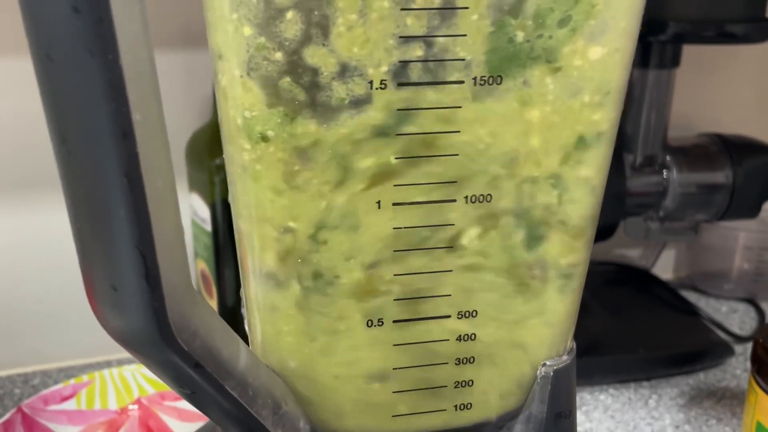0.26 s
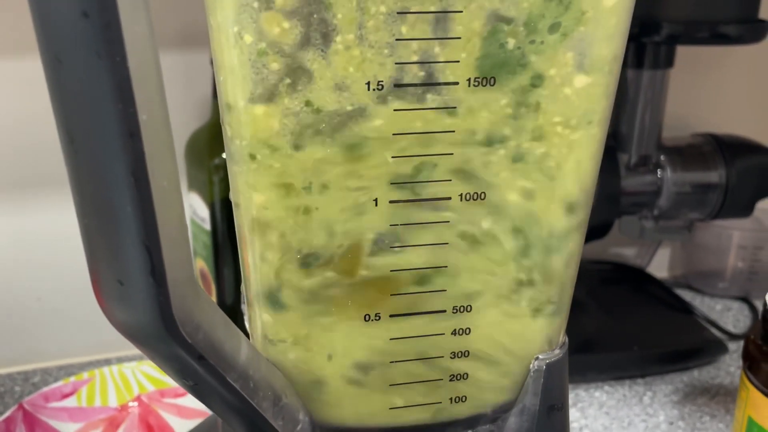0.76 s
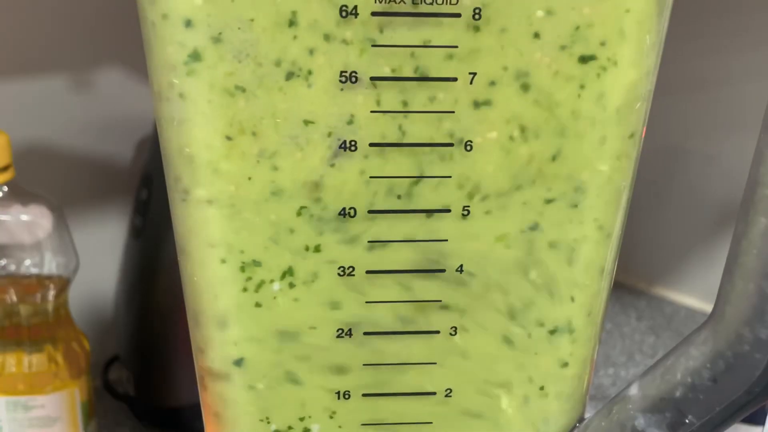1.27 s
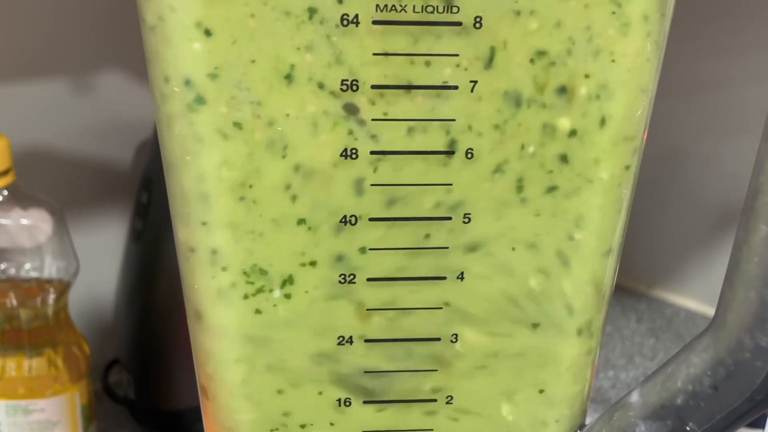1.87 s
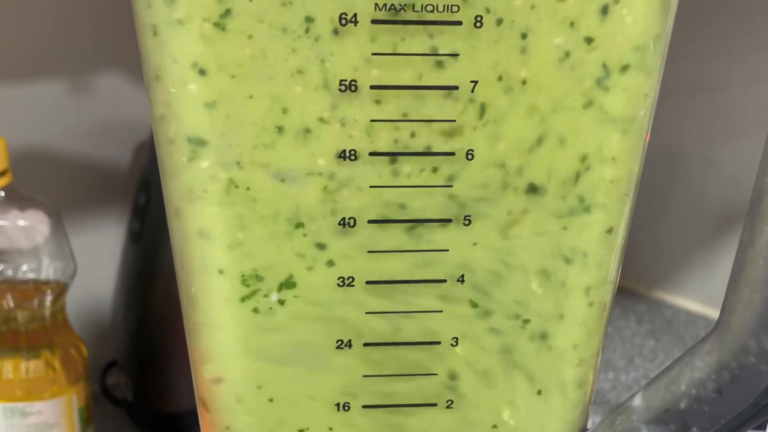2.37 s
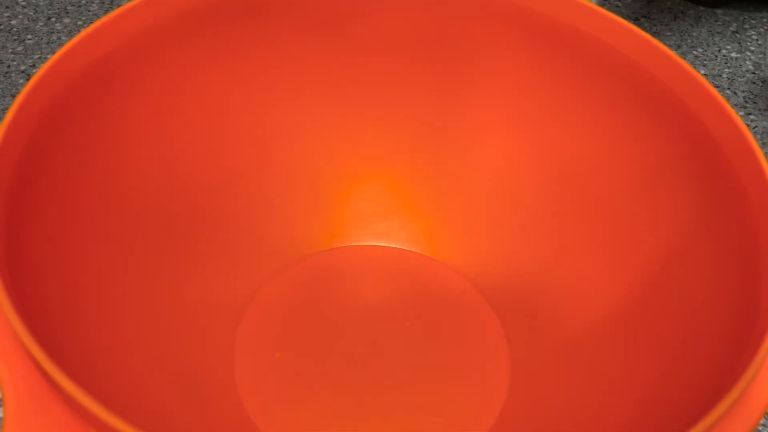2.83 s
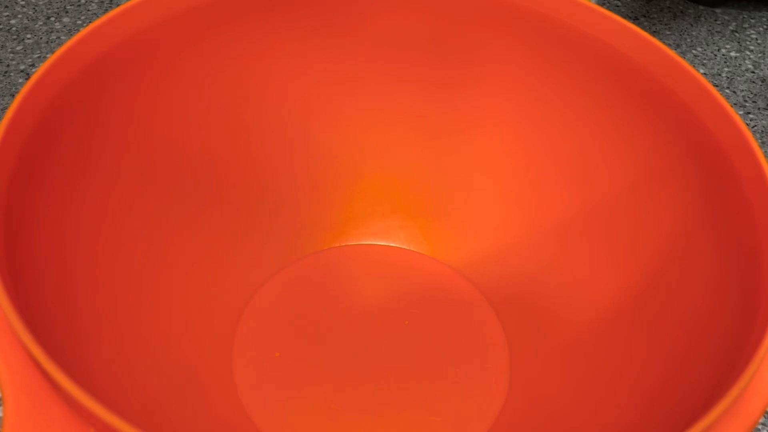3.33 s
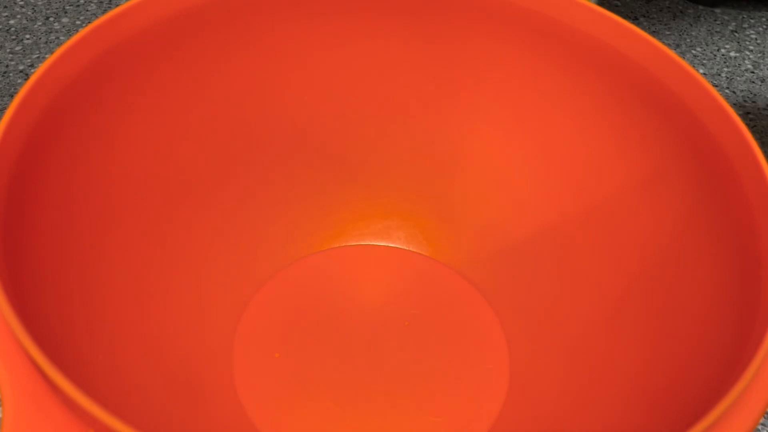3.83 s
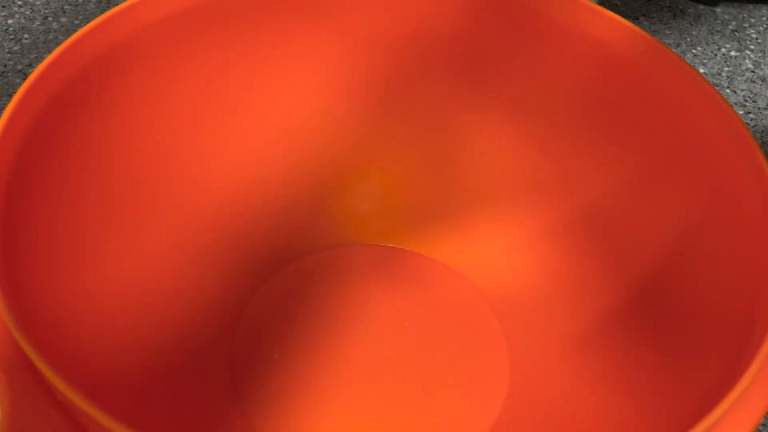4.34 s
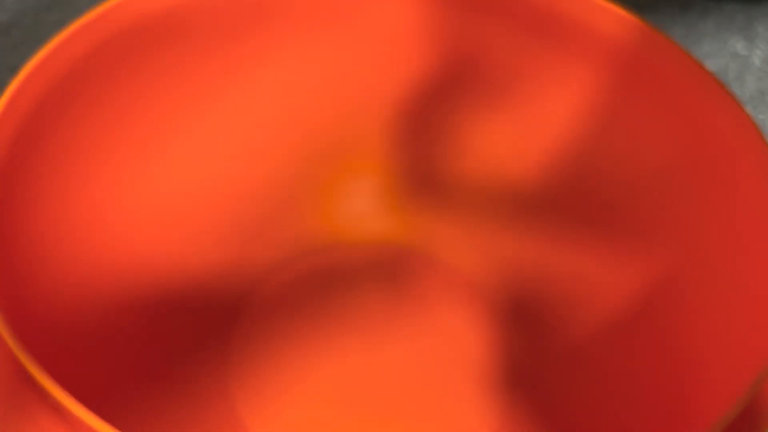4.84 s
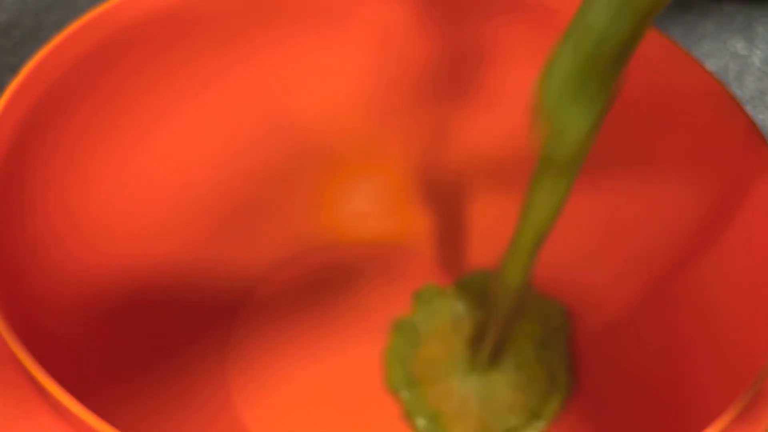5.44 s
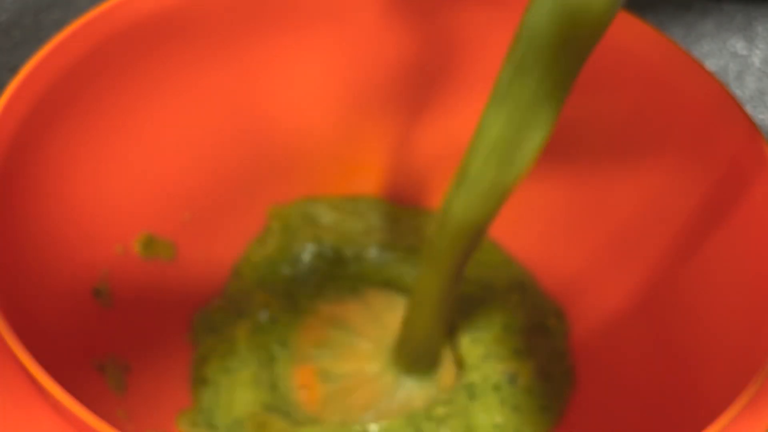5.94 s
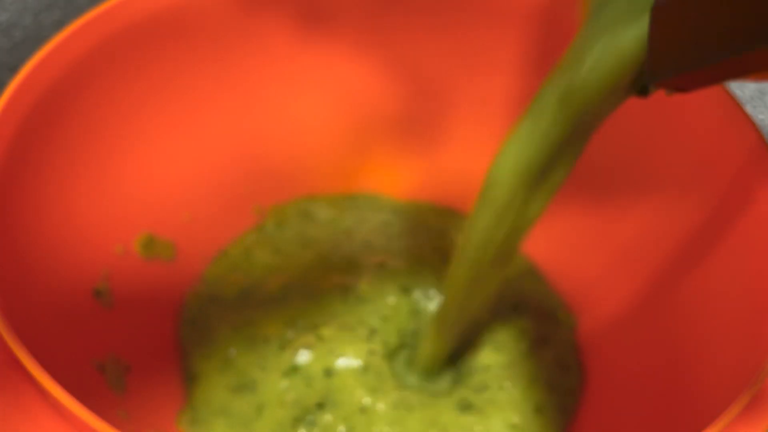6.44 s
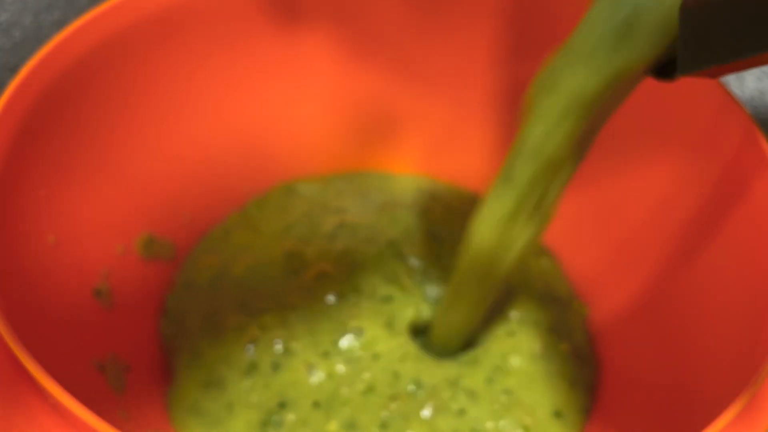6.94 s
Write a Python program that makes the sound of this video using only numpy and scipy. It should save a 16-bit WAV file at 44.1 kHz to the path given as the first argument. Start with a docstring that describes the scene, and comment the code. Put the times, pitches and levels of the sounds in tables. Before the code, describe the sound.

Loud blender churning and whining at two speeds stops dead, hollow plastic knocks follow, then thick wet sauce pours crackling and plopping into a plastic bowl.

```python
"""A countertop blender churns a herb sauce: first slow and chunky, then abruptly faster and smooth.
Noise shaped by the jug, plus a hum and a whine tied to the turning drive, make its sound.
The scene cuts abruptly to the handling of the plastic jug, which knocks about (damped tones); then thick
sauce pours into a plastic bowl with wet splats (noise bursts and bubbles) and crackle (random clicks).
A phone close by hears it all, with a short room tail and a low room rumble."""
import sys
import numpy as np
from scipy import signal
from scipy.fft import rfft, irfft
from scipy.io import wavfile
from scipy.ndimage import uniform_filter1d

SR = 44100
rng = np.random.default_rng(int(sys.argv[2]) if len(sys.argv) > 2 else 0)


def put_to_file(sound):
    """Save the sound as 16-bit audio at rate SR, in the file named by the first command-line argument."""
    columns = np.atleast_2d(sound).T  # one column per channel
    safe = np.clip(columns, -1, 1)
    whole_steps = np.round(safe * 32767)
    wavfile.write(sys.argv[1], SR, whole_steps.astype(np.int16))


N = 317520
TIME, BINS = np.arange(N) / SR, np.arange(N // 2 + 1) * SR / N  # seconds; Hz
CUT_S, POUR_S = 2.70, 5.377  # cut from blending to handling; the pouring starts

# How strongly the sauce flows. Each row: time in seconds, crackle level in dB.
FLOW = [(5.36, -59), (5.43, -57), (5.56, -50), (5.83, -44), (6.1, -43.5), (6.45, -47.5), (6.81, -50.5),
        (7.2, -53)]


def amp(db):
    """Decibels to gain."""
    return 10 ** (np.asarray(db) / 20)


def unit(x):
    """Scale to rms 1."""
    return x / np.sqrt(np.mean(x ** 2))


def curves(table):
    """Each column of a time table at every sample."""
    s, *columns = np.transpose(table)
    return [np.interp(TIME, s, c) for c in columns]


def read_db(points, hz):
    """Read a (Hz, dB) table on a log-frequency axis."""
    f, db = np.transpose(points)
    return np.interp(np.log(np.maximum(hz, 1)), np.log(f), db)


def shape(x, gain):
    """Filter a whole track by a gain per frequency bin."""
    return irfft(rfft(x) * gain, N)


def above(hz, order=4):
    """High-pass gain per frequency bin."""
    return (BINS / hz) ** order / np.sqrt(1 + (BINS / hz) ** (2 * order))


def band(x, lo_hz, hi_hz, order=2):
    """Causal band-pass."""
    sos = signal.butter(order, [lo_hz, min(hi_hz, .45 * SR)], "band", fs=SR, output="sos")
    return signal.sosfilt(sos, x)


def walk(rate):
    """Smooth chance with rms 1, changing about rate times a second."""
    k = max(int(SR / rate), 1)
    steps = np.repeat(rng.standard_normal(N // k + 1), k)
    return unit(uniform_filter1d(uniform_filter1d(steps, k), k)[:N])


def fade(t, t60):
    """Exponential decay, 60 dB down at t60."""
    return np.exp(-np.log(1000) * t / t60)


def gate(start, stop):
    """On between two times, with 4 ms edges."""
    return uniform_filter1d(((TIME >= start) & (TIME < stop)) * 1., 176)


def add(track, s, sound):
    """Mix a sound into a track at time s."""
    i = min(max(int(s * SR), 0), N)
    track[i:i + len(sound)] += sound[:N - i]


def clicks(rate, spread_db):
    """Random impulses, mostly small and a few large."""
    size = amp(spread_db * np.minimum(rng.exponential(size=N), 4))
    return (rng.random(N) < rate / SR) * size * rng.choice([-1, 1], N)


def blender(run, colour, body, orders, churn_db, hum_db, whine_db, chop_db, slosh_db, beat, wobble):
    """Blades churn and chop sauce in a ringing jug; the drive hums and the motor whines with its speed."""
    whine_per_turn = 65
    whine_hz, line_db, load_db = curves(run)
    turn = np.cumsum(whine_hz * (1 + wobble * walk(38.9))) / SR / whine_per_turn
    # turbulence throbs as the blades pass; bits of food add ticks
    throb = 1 + beat * np.cos(2 * np.pi * 5 * turn)
    stir = rng.standard_normal(N) * throb + amp(chop_db) * unit(clicks(350, 2.0))
    # the vortex sloshes, so each octave swells a little on its own
    octave = np.log2(np.clip(BINS, 40, 10240) / 40)
    churn = 0
    for k in range(9):
        part = shape(stir, np.maximum(1 - abs(octave - k), 0))
        churn = churn + part * amp(slosh_db * walk(22.33) / (1 + 0.59 * abs(k - 3)))
    lift_db = sum(db / (1 + (2 * (BINS - hz) / width) ** 2) for hz, width, db in body)
    churn = unit(shape(churn, amp(read_db(colour, BINS) + lift_db) * above(31.4, order=10)))
    hum = 0
    for k, db in orders:
        phase = 2 * np.pi * (round(k) * turn + rng.random()) + 0.25 * walk(8.63)
        hum = hum + amp(db + 1.2 * walk(7.21)) * np.sin(phase)
    whine = unit(amp(0.2 * walk(18.4)) * np.sin(2 * np.pi * whine_per_turn * turn))
    drive = amp(churn_db) * churn + amp(hum_db) * unit(hum)
    return amp(load_db) * drive + amp(line_db + whine_db) * whine


def blending():
    """A slow run through chunks, then a faster run through smooth sauce with low motor tones."""
    change_s = 1.072
    # The two runs. Each row: time in seconds, whine pitch in Hz,
    # whine level in dB, level of churning and hum in dB (levels before the trims below).
    chunky_run, smooth_run = [(0.03, 2340, -28, -18), (0.372, 2343, -25, -18), (1.05, 2350, -23.5, -17.5)], [(1.12, 2779, -33, -24.5), (2.62, 2782, -33, -25)]
    # Colour of the churning noise. Each row: frequency in Hz, relative level in dB per Hz.
    chunky_colour, smooth_colour = [(45, -2.5), (110, 0.5), (270, 1), (600, -5.5), (1250, -8.5), (2100, -8),
                                    (3200, -15), (5100, -14.5), (7000, -18.5), (10000, -22), (12300, -30),
                                    (15500, -42)], [(45, -32), (110, -3), (270, -3.5), (550, -3),
                                                           (1350, -12.5), (2200, -11), (3450, -18.5),
                                                           (5000, -14.5), (7500, -20.5), (10500, -25.5),
                                                           (13000, -30.5), (15500, -42)]
    # Resonances of jug and housing. Each row: frequency in Hz, width in Hz, lift in dB.
    chunky_body, smooth_body = [(416, 26, 0), (680, 110, 4), (1654, 83, 9), (2210, 140, 6),
                                (4190, 160, 5.5), (5140, 400, 4), (9230, 290, 10.5)], [(540, 39, 4.4), (1715, 38, 9.3), (2168, 150, 9.1),
                                                     (2885, 260, 9.5), (3820, 110, 4.8), (4216, 120, 8.5),
                                                     (9480, 270, 8.9)]
    # Hum and high tones of the drive. Each row: multiple of the turn rate, relative level in dB.
    chunky_orders, smooth_orders = [(6, 0.5), (7, 3), (12, 1), (15, 1)], [(1, 3), (2, -3), (5, 5), (6, -16), (7, -4.5),
                                                           (8, -2), (12, -8), (14, -4), (18, -2.5),
                                                           (23, -8.5), (95, -7), (120, -7), (245, -11)]
    # Low motor tones at the higher speed. Each row: frequency in Hz, typical level in dB.
    motor_tones = [(113, -38), (120, -48), (156, -50)]
    chunky = blender(chunky_run, chunky_colour, chunky_body, chunky_orders,
                     churn_db=-3.0, hum_db=-13.5, whine_db=-2.5, chop_db=-11.0, slosh_db=2.0,
                     beat=0.064, wobble=0.002)
    smooth = blender(smooth_run, smooth_colour, smooth_body, smooth_orders,
                     churn_db=0.0, hum_db=-4.0, whine_db=-3.5, chop_db=-8.0, slosh_db=0.5,
                     beat=0.1, wobble=0.00043)
    tones = 0
    for hz, db in motor_tones:
        tone = np.sqrt(2) * np.sin(2 * np.pi * hz * TIME + 0.48 * walk(24.74))
        tones = tones + amp(db + 2.3 * walk(11)) * tone
    return chunky * gate(0, change_s) + (smooth + tones) * gate(change_s, CUT_S)


def lump():
    """The blades tear through a lump: a brief surge of dull chopping."""
    centre_s, width_s, level_db = 0.737, 0.11, -29
    chop = unit(band(clicks(300, 1.5), 200, 940))
    return amp(level_db) * chop * np.exp(-((TIME - centre_s) / width_s) ** 2)


def boom(hz, rise_s, t60, glide):
    """A damped tone that swells quickly and glides by some octaves in its first 0.1 s."""
    t = np.arange(SR // 3) / SR
    ratio = 2 ** (glide * np.minimum(10 * t, 1))
    swell = np.minimum(t / rise_s, 1) ** 2 * fade(np.maximum(t - rise_s, 0), t60)
    return swell * np.sin(2 * np.pi * hz * np.cumsum(ratio) / SR)


def wall_ring(hz, t60, spread=0.072):
    """A plastic wall rings with a cluster of close, unevenly spaced modes."""
    t = np.arange(SR // 3) / SR
    detune, phase = rng.uniform(-1.11, 1, size=(2, 16))
    modes = sum(np.sin(2 * np.pi * (hz * (1 + spread * d) * t + p)) for d, p in zip(detune, phase))
    return unit(modes) * fade(t, t60) * (1 - np.exp(-t * hz))


def knock(level_db, upper_hz, lower_hz, low_db, high_db, contact_s=0.00087, crack_db=-3, crack_t60=0.063,
          knock_db=-12, low_lift_db=12, high_lift_db=9, favour_db=9, favour_octaves=0.16, top_hz=6000):
    """A rough contact rings the plastic; its place favours some modes, and harder blows reach higher."""
    # What the plastic rings with. Each row: frequency in Hz, relative level in dB, t60 in seconds.
    plastic = [(340.5, 6.5, 0.13), (430, 10.5, 0.08), (666, 7.5, 0.089), (769, 4, 0.15), (855, 12, 0.057),
               (971, 10.5, 0.065), (1260, 10.5, 0.023), (1397, 11.5, 0.023), (2110, 14.5, 0.072),
               (2380, 29, 0.012), (2780, 14, 0.064), (3560, 20.5, 0.017)]
    t = np.arange(SR // 4) / SR
    chance = rng.standard_normal((3, len(t)))
    ring = 0
    for (hz, db, t60), detune, phase in zip(plastic, chance[0], chance[1]):
        near = sum(np.exp(-(np.log2(hz / place_hz) / favour_octaves) ** 2)
                   for place_hz in (upper_hz, lower_hz))
        tone = np.sin(2 * np.pi * (hz * (1 + 0.0174 * detune) * t + phase))
        ring = ring + amp(db + favour_db * near) * fade(t, t60) * tone
    crack = band(chance[2], 110, 7000, order=1) * fade(t, crack_t60)
    blow = (unit(ring) + amp(crack_db) * unit(crack)) * (1 - np.exp(-t / contact_s))
    reach_hz = top_hz * 2 ** max((level_db + 23.0) / 10, 0)
    out = 0
    # low, middle and treble, each levelled by its first 25 ms
    for lo, hi, db in ((260, 514, low_db + low_lift_db),
                       (764, 1640, 0),
                       (2060, reach_hz, high_db + high_lift_db)):
        part = band(blow, lo, hi)
        out = out + amp(level_db + db + knock_db) * part / np.std(part[:SR // 40])
    return out


def knocks():
    """The housing rings out; then each jug knock leaves one wall ringing and brings a low boom."""
    # Knocks of the jug. Each row: start in seconds, level in dB, upper and lower Hz that the blow favours,
    # low ring in dB, treble in dB (these three levels before the trims in knock),
    # ringing wall in Hz, its dB and t60 in seconds, boom in Hz, its dB,
    # its glide in octaves per 0.1 s, its swell in seconds, its t60 in seconds.
    blows = [(2.798, -17, 1450, 305, -13, -15, 1450, -21, 0.036, 185, -17.5, -0.73, 0.02, .19),
             (3.031, -40, 915, 346, -3.5, -12, 960, -40, 0.11, 240, -25.5, -0.74, 0.02, .08),
             (3.313, -11.5, 1310, 386, -13, -12.5, 1392, -22.5, .03, 119, -16, -0.98, 0.029, 0.069),
             (4.055, -26, 745, 433, -2, -5, 2560, -47, 0.28, 162.4, -11.5, -1.86, 0.026, 0.16),
             (4.381, -16, 1230, 379, -13, -20, 1010, -31, .04, 111, -18, .94, 0.023, 0.35),
             (4.637, -34.5, 820, 373, -6, -12, 794, -39, 0.15, 198, -20.5, .29, 0.015, 0.19),
             (4.788, -12.5, 905, 345, -12.5, -14, 876, -19, 0.044, 208, -10.5, -0.17, 0.013, 0.19)]
    out = np.zeros(N)
    add(out, CUT_S, amp(-45) * boom(920, rise_s=.002, t60=0.44, glide=0))  # housing
    for row in blows:
        s, db, upper_hz, lower_hz, low_db, high_db = row[:6]
        ring_hz, ring_db, ring_t60, boom_hz, boom_db, glide, swell_s, boom_t60 = row[6:]
        add(out, s, knock(db, upper_hz, lower_hz, low_db, high_db))
        add(out, s, amp(ring_db) * wall_ring(ring_hz, ring_t60))
        add(out, s, amp(boom_db) * boom(boom_hz, swell_s, boom_t60, glide))
    return out


def touches(body_t60=.075, click_t60=0.024, contact_s=0.00096, hollow_db=-2):
    """Light contacts of hand and jug: a sharp click and a short hollow answer of the plastic."""
    # Each row: start in seconds, body level in dB, click level in dB (both before the fades).
    contacts = [(2.856, -34, -35), (2.936, -43, -54), (2.957, -47, -52), (3.01, -40, -40), (3.07, -42, -44),
                (3.173, -46.5, -48), (3.388, -36, -41), (3.443, -47, -36), (3.573, -53, -47),
                (3.799, -45, -34.5), (3.98, -56, -47.5), (4.224, -55, -51), (4.304, -42, -40.5),
                (4.483, -35, -54), (4.566, -54, -49), (4.661, -41, -43), (5.315, -69, -55)]
    out, t = np.zeros(N), np.arange(SR // 8) / SR
    for s, body_db, click_db in contacts:
        chance = rng.standard_normal((2, len(t)))
        body = unit(band(chance[0], 540, 1070)) + amp(hollow_db) * unit(band(chance[0], 270, 460))
        click = unit(band(chance[1], 2000, 3100, order=1))
        touch = amp(body_db) * body * fade(t, body_t60) + amp(click_db) * click * fade(t, click_t60)
        add(out, s, touch * (1 - np.exp(-t / contact_s)))
    return out


def pool_depth(s):
    """How far the pool has gathered on the bottom of the bowl, 0-1."""
    start_s, fill_s = 5.47, 0.53
    return np.clip((s - start_s) / fill_s, 0, 1)


def bubble(t, hz, cycles, glide=0.16):
    """A pocket of air rings for some cycles, rising in pitch."""
    age = np.clip(t * hz / cycles, 0, 2)
    tone = np.sin(2 * np.pi * cycles * age * (1 + glide * age / 2))
    return tone * fade(age, 0.78) * (1 - np.exp(-age * cycles))


def splat(hz, snap_db, depth, burst_db=-2, squelch_db=-1, spray_t60=0.032, snap_t60=0.0029,
          spray_share=0.51, rise_s=0.00084, cycles=22, chain_s=.014, chain_octaves=.3,
          low_db=-17, pool_lift_db=11, high_db=-9):
    """A fold snaps, squelches around its trapped air's pitch and sprays; a deeper pool adds body."""
    t = np.arange(SR // 12) / SR
    chance = rng.standard_normal((2, len(t)))
    swell = 1 - np.exp(-t / rise_s)
    decay = fade(t, snap_t60) + spray_share * fade(t, spray_t60)
    wet = chance[0] * amp(1.5 * chance[1]) * decay * swell
    # the fold breaks into a quick chain of lesser bubbles
    squelch = 0
    for late, pitch in rng.random(size=(6, 2)):
        bubble_hz = hz * 2 ** (chain_octaves * (2 * pitch - 1))
        squelch = squelch + amp(-12 * late) * bubble(t - chain_s * late, bubble_hz, cycles / 2)
    snap = unit(band(wet, 2000, 8000)) + amp(high_db) * unit(band(wet, 3800, 9300))
    body = amp(low_db + pool_lift_db * depth) * unit(band(wet, 366, 1100))
    burst = amp(burst_db) * unit(bubble(t, hz, cycles))
    sound = amp(snap_db) * snap + burst + amp(squelch_db) * unit(squelch) + body
    return sound / np.std(sound[:SR // 125])  # levelled by its first 8 ms


def splats(splat_db=-2.5, scatter_db=5, scatter_octaves=0.8, small_snap_db=-5):
    """Big folds splat and thud on the bowl; small ones fall at random, as strong as the flow."""
    # Loudest splats. Each row: start in seconds, level in dB before the trim splat_db,
    # pitch of the trapped air in Hz, snap level in dB before it is mixed with the bubbles.
    folds = [(5.415, -32, 3160, -4), (5.543, -28.5, 2860, -1.5), (5.603, -33.5, 4540, -7),
             (5.678, -25, 1810, 1), (5.752, -26.5, 2120, -1), (5.836, -29, 1920, 18), (5.886, -32, 2670, 0),
             (5.895, -25, 1840, -4), (5.923, -27, 2280, -9), (5.968, -28.5, 2000, 1),
             (5.977, -21.5, 5240, 3), (6.028, -30, 2280, -8), (6.077, -23, 1180, 3.5),
             (6.102, -25.5, 1920, -14), (6.128, -28, 1870, -9), (6.156, -29, 2020, -10),
             (6.195, -38.5, 734, -20), (6.227, -34, 2230, -8), (6.291, -40, 2400, -8),
             (6.389, -29, 5140, -0.5), (6.435, -35, 2200, -3), (6.465, -32, 2700, -2),
             (6.537, -37.5, 2600, -2), (6.65, -37.5, 740, -10), (6.745, -36, 590, -1),
             (6.855, -17, 1270, 8.5), (6.893, -23.5, 1210, 3.5), (6.918, -39, 2350, -10),
             (6.973, -27, 780, 7), (7.038, -23, 2400, -9), (7.08, -26, 645, -11)]
    big_pocket_hz, thud_db, thud_lag_s = 960, 7, 0.0109
    small_per_s, small_db, small_hz = 55, 1, 2000
    out = np.zeros(N)
    for s, db, hz, snap_db in folds:
        add(out, s, amp(db + splat_db) * splat(hz, snap_db, pool_depth(s)))
        # a fold that traps a big pocket of air is heavy enough to thud
        weight = 1 / (1 + (hz / big_pocket_hz) ** 4)
        thud = boom(160, rise_s=0.0116, t60=0.027, glide=0)
        add(out, s + thud_lag_s, amp(db + thud_db) * weight * thud)
    flow_db, = curves(FLOW)
    for k, (late, size, pitch) in enumerate(rng.uniform(-1, 1, size=(100, 3))):
        s = POUR_S + (k + 2 + 2 * late) / small_per_s
        db = np.interp(s, TIME, flow_db) + small_db + scatter_db * size
        hz = small_hz * 2 ** (scatter_octaves * pitch)
        add(out, s, amp(db) * splat(hz, small_snap_db, pool_depth(s)))
    return out


def snaps(snap_t60=0.0081, spray_t60=0.046, spray_db=-13):
    """Films of sauce burst with a sharp dry tick and a trace of spray."""
    # Each row: start in seconds, level in dB before the fade.
    bursts = [(5.38, -33), (5.4, -29), (5.439, -30), (5.652, -37), (5.74, -22.5), (5.864, -30),
              (6.061, -26), (6.292, -37), (6.322, -26), (6.69, -24.5), (6.839, -42), (6.8555, -39),
              (7.163, -25)]
    out, t = np.zeros(N), np.arange(SR // 20) / SR
    for s, db in bursts:
        tick = unit(band(rng.standard_normal(len(t)), 3800, 12000, order=1))
        add(out, s, amp(db) * tick * (fade(t, snap_t60) + amp(spray_db) * fade(t, spray_t60)))
    return out


def grains(hz, rate, spread_db, cycles):
    """Random air pockets near one pitch; thick sauce damps each within some cycles."""
    t = np.arange(SR // 20) / SR
    grain = np.sin(2 * np.pi * hz * t * (1 + 2 * t)) * fade(t, cycles / hz) * (1 - np.exp(-t * hz))
    return unit(signal.fftconvolve(clicks(rate, spread_db), grain)[:N])


def stream(crackle_db=0, fizz_db=-10, gurgle_db=-5, gurgle_hz=2100, gurgle_octaves=0.32,
           blob_db=-50, drum_db=-42, clump_db=6.5):
    """The ribbon crackles with bursting films; a stronger flow folds in more air, which gurgles."""
    # Colour of the crackle. Each row: frequency in Hz, relative level in dB per Hz.
    sauce_colour = [(400, -19), (700, -22), (1200, -17), (2000, -7), (2900, -5), (5000, -3.5), (7000, -2.5),
                    (10000, -2.5), (13000, -10.5), (15500, -2)]
    flow_db, = curves(FLOW)
    films = unit(clicks(1100, 4.3)) + amp(fizz_db) * rng.standard_normal(N)
    films = unit(shape(films, amp(read_db(sauce_colour, BINS)) * above(160, order=2)))
    gurgle = 0
    for hz in np.geomspace(1200, 3800, num=12):
        share = np.exp(-(np.log2(hz / gurgle_hz) / gurgle_octaves) ** 2)
        gurgle = gurgle + share * grains(hz, 45, 3.5, 18)
    strength = amp(0.6 * (flow_db - flow_db.max()))
    # the ribbon lands in folds, so the crackle comes in clumps
    wet = (films + amp(gurgle_db) * strength * unit(gurgle)) * amp(clump_db * walk(70))
    # the bowl walls smear every burst over some milliseconds
    t = np.arange(SR // 15) / SR
    smear = rng.standard_normal(len(t)) * fade(t, .045)
    wet = .75 * wet + .65 * signal.fftconvolve(wet, smear / np.linalg.norm(smear))[:N]
    # as a pool gathers, bigger blobs form in it and its weight drums on the bowl
    blobs = unit(sum(grains(hz, 13, 2.2, 11) / hz ** .5 for hz in np.geomspace(340, 900, num=8)))
    drum = unit(sum(grains(hz, 14, 2.5, 12) for hz in (75, 90, 110, 180)))
    pool = pool_depth(TIME) * (amp(blob_db) * blobs + amp(drum_db) * drum)
    return wet * amp(flow_db + crackle_db) * gate(POUR_S, 8) + pool


def bowl(x, direct_db=-2.0):
    """Whatever lands in the bowl rings its hollow."""
    # Hollow resonances. Each row: frequency in Hz, width in Hz, level in dB against the direct sound.
    hollows = [(375, 52, 5), (748, 76, 4), (1240, 45, 0), (1944, 35, -3), (2760, 360, -1.5)]
    ring = sum(amp(db) * signal.lfilter(*signal.iirpeak(hz, hz / width, fs=SR), x)
               for hz, width, db in hollows)
    return amp(direct_db) * (x + ring)


def background(rub_db=-1, rustle_db=-51, scuff_db=-33):
    """A wavering low room rumble; the hand rubs the jug, scuffs by its first knock, rustles by the second."""
    # Faint rubbing of plastic. Each row: time in seconds, level in dB before the trim rub_db.
    rubbing = [(2.74, -60.5), (2.78, -60.5), (3.17, -77), (3.5, -65), (3.62, -61), (3.9, -60.5),
               (3.96, -66.5), (5.17, -73.5), (5.34, -86)]
    # Colour of the room rumble. Each row: frequency in Hz, relative level in dB per Hz.
    room_colour = [(25, -28), (50, -10.5), (70, -2), (140, -11), (177, -11), (290, -21.5), (500, -26.5),
                   (700, -34), (1700, -44.5), (14000, -56)]
    room_db = -39.5
    hand_db, = curves(rubbing)
    room_gain = amp(read_db(room_colour, BINS)) * above(27) / np.sqrt(1 + (BINS / 2500) ** 2)
    room = unit(shape(rng.standard_normal(N), room_gain)) * amp(room_db + 3.7 * walk(7.3))
    rub = unit(band(clicks(3000, 2.5), 1100, 6500, order=1)) * amp(3 * walk(45))
    rub = rub * amp(rub_db + hand_db) * gate(CUT_S, POUR_S)
    scuff = amp(scuff_db) * gate(2.79, 2.8) * unit(band(rng.standard_normal(N), 1400, 1700, order=1))
    rustle = unit(band(rng.standard_normal(N), 700, 1800) * amp(6 * walk(70)))
    rustle = amp(rustle_db) * np.exp(-((TIME - 3.03) / 0.07) ** 2) * rustle
    return room + rub + scuff + rustle


def kitchen(x, tail_db=-15, t60=0.33, early_t60=0.038):
    """Counter and walls: shifting early reflections widen the sound, plus a short diffuse tail."""
    # Early reflections that differ between left and right.
    # Each row: frequency in Hz, side level in dB against the direct sound.
    side_width = [(60, -23), (200, -16.5), (380, -13), (700, -8), (1300, -7.5), (2400, -9.5), (4400, -24.5),
                  (8500, -14)]
    t = np.arange(SR // 2) / SR
    early = rng.standard_normal(len(t)) * fade(t, early_t60)
    scramble = np.exp(1j * np.angle(rfft(early, N)))  # changes phase only
    side = shape(x, scramble * amp(read_db(side_width, BINS)))
    side = side * unit(np.tanh(2 * walk(30)))
    tail = band(rng.standard_normal(len(t)), 120, 8600, order=1)
    tail = tail * fade(t, t60) * np.minimum(t / 0.029, 1)
    mid = x + amp(tail_db) * signal.fftconvolve(x, tail / np.linalg.norm(tail) / 2)[:N]
    return np.array([mid + side, mid - side])


def scene():
    """Blending and its room tail cut off abruptly; handling and pouring follow over the room rumble."""
    running = kitchen(blending() + lump()) * gate(0, CUT_S)
    poured = bowl(splats() + snaps() + stream())
    return running + kitchen(knocks() + touches() + poured + background())


def record(dry):
    """Left and right differ a little in colour; the phone's stereo processing puts their treble out of step.

    The top is cut."""
    # Each row: frequency in Hz, left minus right level in dB.
    channel_balance = [(100, 0.5), (380, 0), (1300, 0.3), (1700, -3), (2400, 4), (3100, 1.5), (4400, 0),
                       (8000, 0)]
    # Each row: frequency in Hz, half cycles by which the right channel leads.
    channel_phase = [(6200, 0), (7800, 1), (8700, 1), (11100, 2), (12400, 2), (14200, 3)]
    top_hz = 15800
    tilt = amp(read_db(channel_balance, BINS) / 2)
    lead = np.exp(1j * np.pi * np.interp(BINS, *np.transpose(channel_phase)))
    channels = np.array([shape(dry[0], tilt), shape(dry[1], lead / tilt)])
    return signal.sosfilt(signal.ellip(10, .2, 80, top_hz, fs=SR, output="sos"), channels)


dry = scene()
out = record(dry)
put_to_file(out)
```